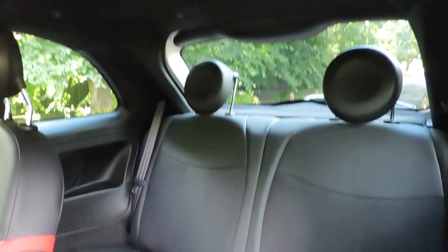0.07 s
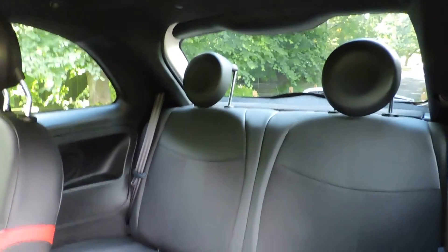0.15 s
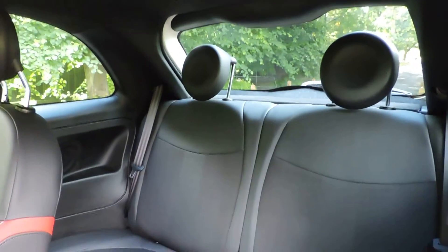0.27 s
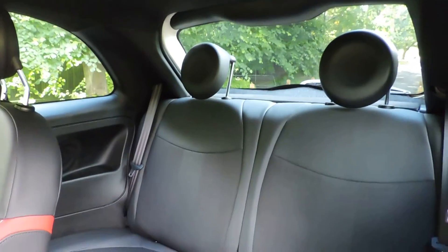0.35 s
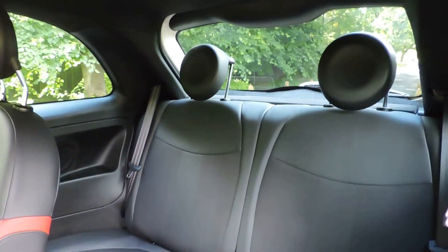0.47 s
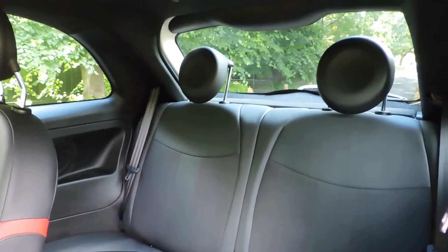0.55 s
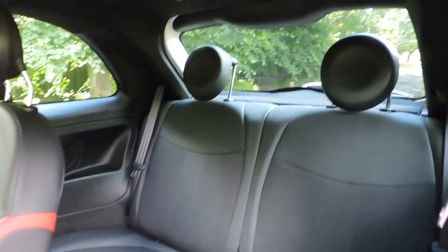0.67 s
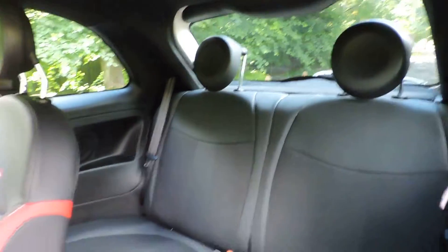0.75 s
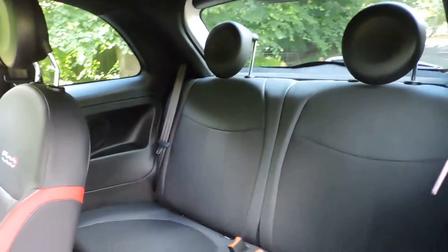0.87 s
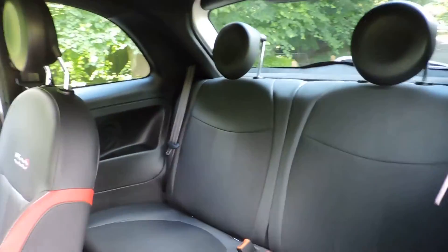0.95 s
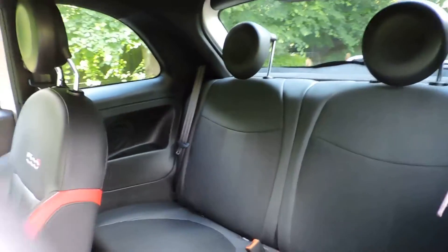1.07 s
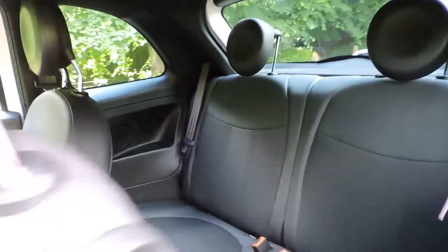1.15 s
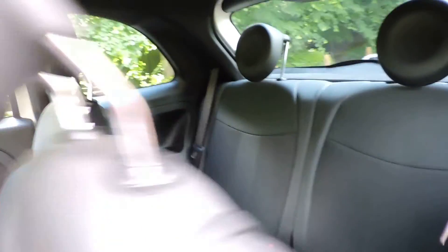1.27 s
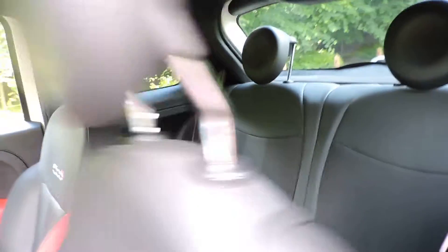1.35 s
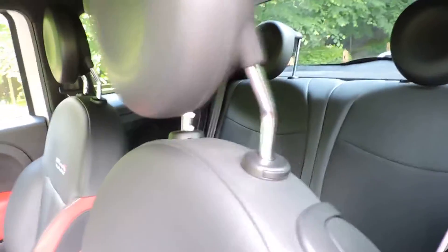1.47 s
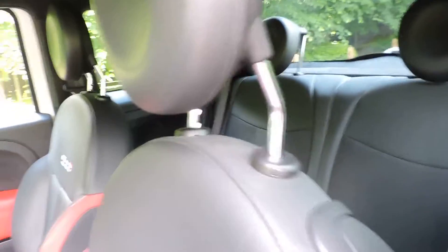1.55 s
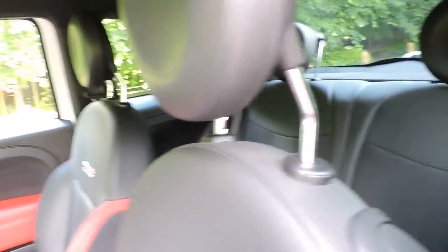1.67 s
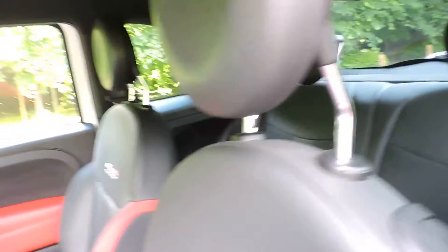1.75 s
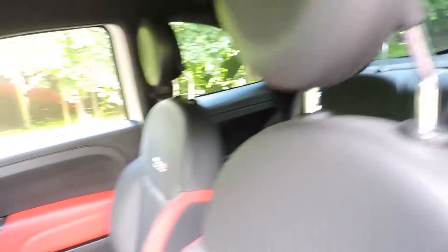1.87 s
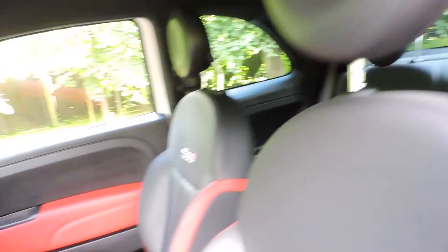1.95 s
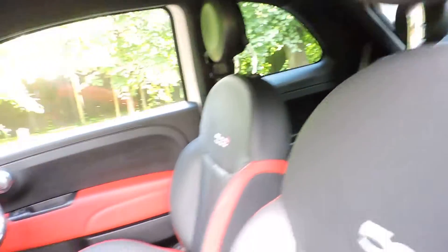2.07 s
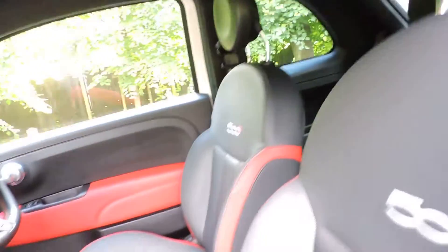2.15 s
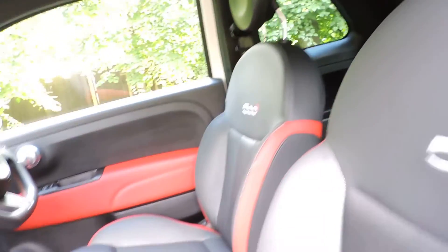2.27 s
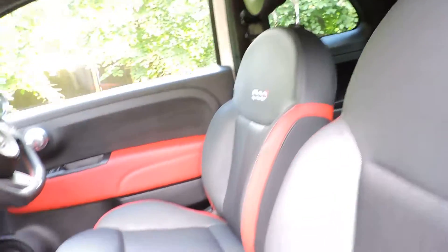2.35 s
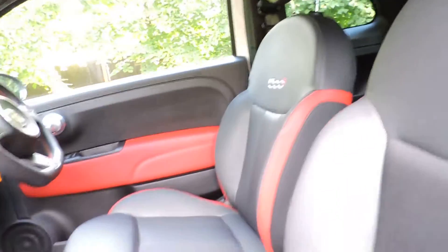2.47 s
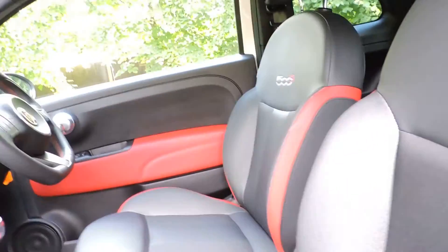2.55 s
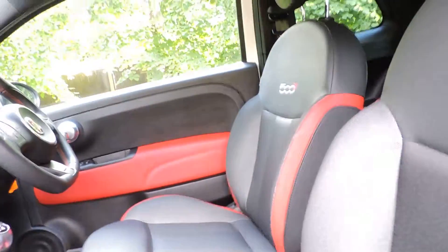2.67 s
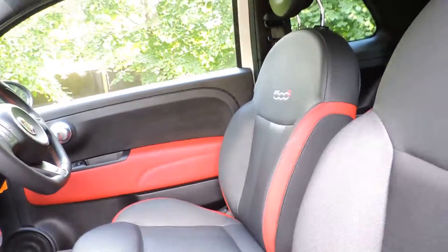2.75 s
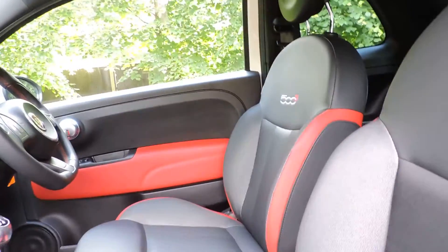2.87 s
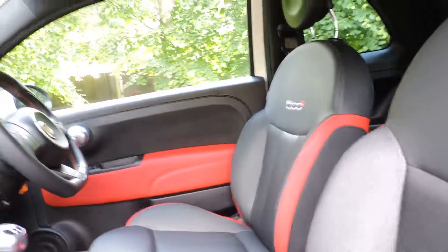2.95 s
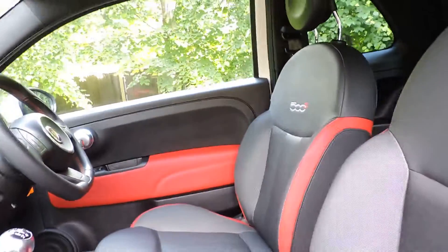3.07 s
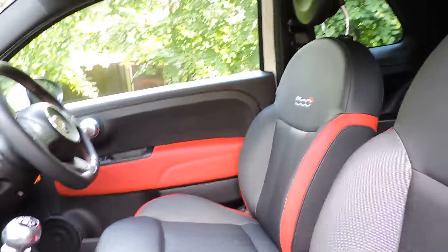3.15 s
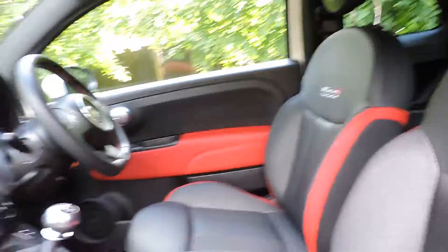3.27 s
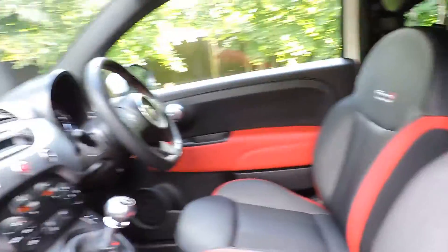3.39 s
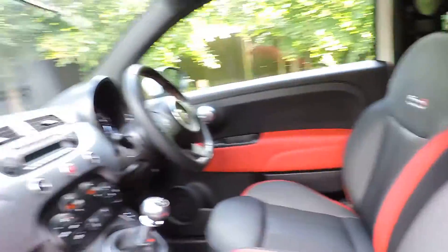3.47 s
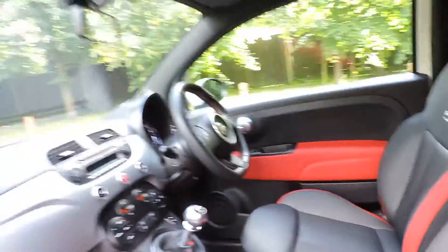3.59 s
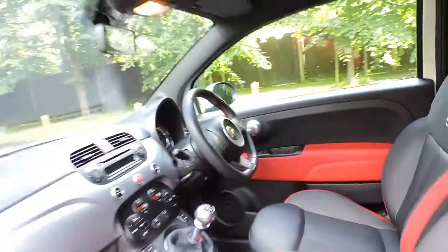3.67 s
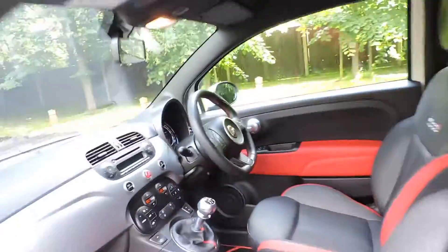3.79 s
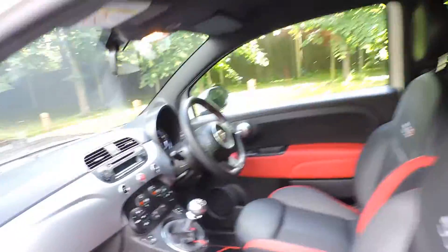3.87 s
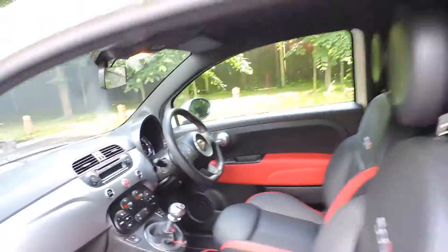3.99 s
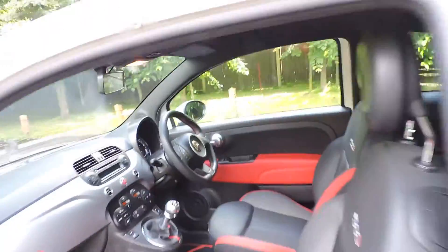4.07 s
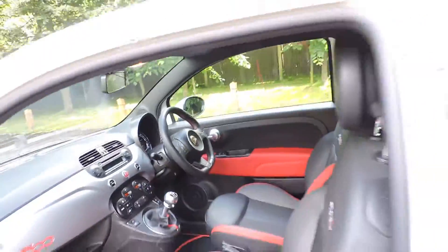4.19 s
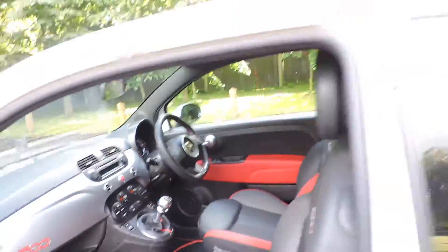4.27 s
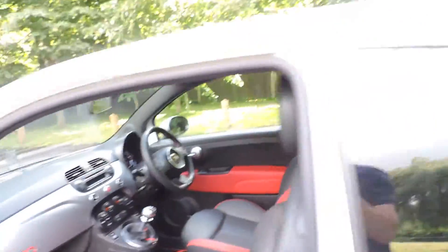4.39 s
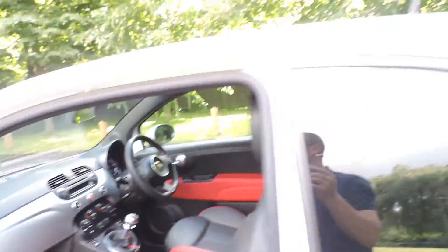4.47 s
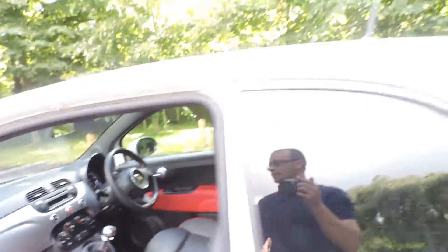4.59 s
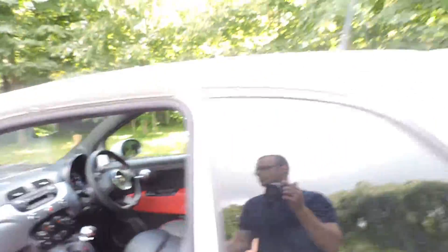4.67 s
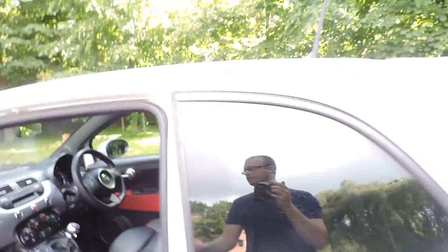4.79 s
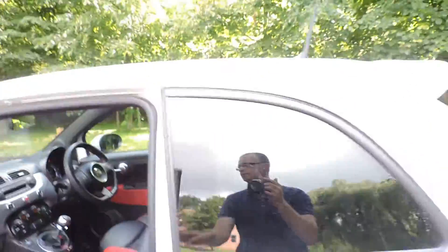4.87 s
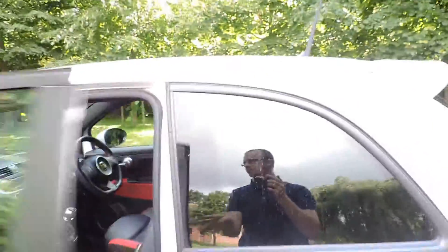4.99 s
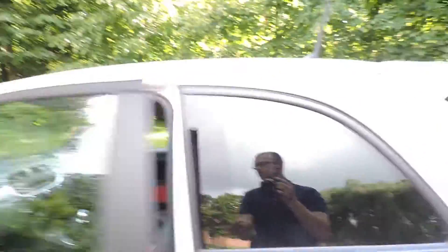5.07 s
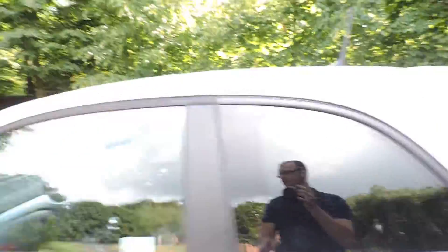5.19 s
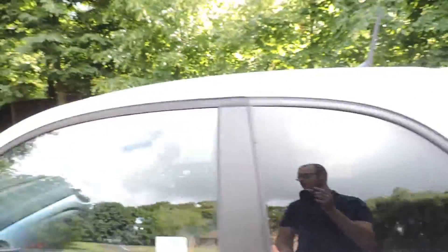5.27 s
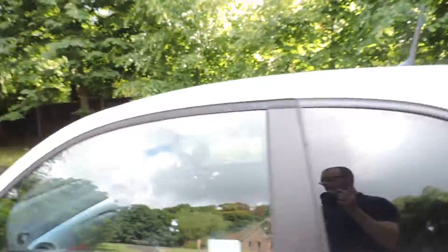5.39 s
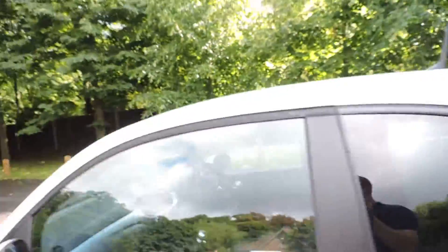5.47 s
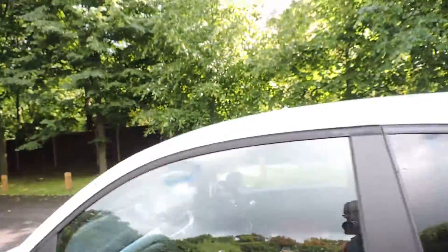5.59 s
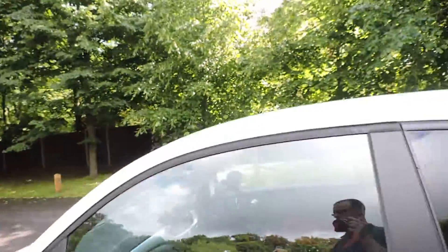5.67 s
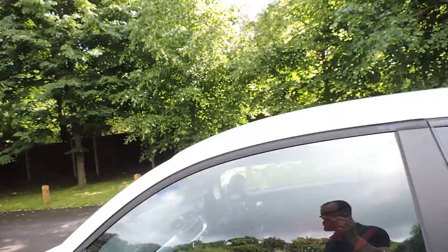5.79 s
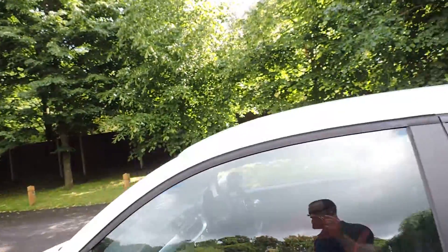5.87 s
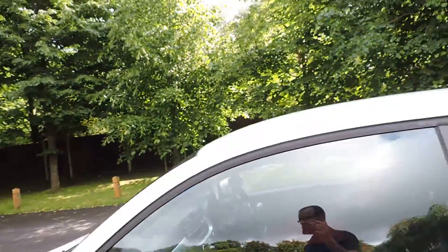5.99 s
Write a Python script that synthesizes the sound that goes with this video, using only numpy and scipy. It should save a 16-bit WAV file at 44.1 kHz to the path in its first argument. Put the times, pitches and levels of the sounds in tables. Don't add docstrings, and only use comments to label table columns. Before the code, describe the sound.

In and beside a small car, light plastic ticks precede a bright steel clack. Upholstery swishes and a padded seat back lands with a dull knock. Feet bump and scrape, a buckle clinks, a strap and sleeves rustle. A quick latch snap merges into a huge, short, distorted door slam, after which the distant traffic dips, then returns with a high bird whistle.

```python
import sys
import numpy as np
from scipy import signal
from scipy.fft import rfft, irfft, next_fast_len
from scipy.io import wavfile
from scipy.ndimage import uniform_filter1d

SR = 44100
rng = np.random.default_rng(int(sys.argv[2]) if len(sys.argv) > 2 else 0)


def digitize_waveform(pressure):
    field = np.atleast_2d(pressure).T
    bounded = np.clip(field, -1, 1)
    quanta = np.round(bounded * 32767).astype(np.int16)
    wavfile.write(sys.argv[1], SR, quanta)


def volts_from_decibels(level):
    exponent = np.asarray(level, float) / 20
    return 10 ** exponent


N = 265923
LONG = next_fast_len(N)
T = np.arange(2 ** 14) / SR


def unit(x):
    return x / np.sqrt(np.mean(x ** 2) + 1e-30)


def band(x, lo_hz, hi_hz):
    return signal.sosfilt(signal.butter(2, [lo_hz, min(hi_hz, 20000)], "bandpass", fs=SR, output="sos"), x)


def on_log(hz, table):
    table_hz, values = np.transpose(table)
    return np.interp(np.log(hz + 1), np.log(table_hz), values)


def fade(t60):
    return np.exp(-np.log(1000) * T / max(t60, .002))


def walk(rate):
    hold = int(SR / rate)
    levels = np.repeat(rng.standard_normal(N // hold + 1), hold)
    return 0.67 * uniform_filter1d(uniform_filter1d(levels, hold), hold)[:N]


def add(out, s, pair):
    i = int(s * SR)
    out[:, i:i + pair.shape[1]] += pair[:, :N - i]


def strokes(table):
    t = np.linspace(0, N / SR, num=N // 20)
    gain = 0
    for s, db, swell_s, fade_s in table:
        away = np.maximum((s - t) / max(swell_s, .002), (t - s) / max(fade_s, .002))
        gain = gain + volts_from_decibels(db - 20 * away ** 1.32)
    return np.interp(np.arange(N) / SR, t, gain)


def pushed(table):
    out = np.zeros((2, N))
    for s, size, hz, push_s, t60 in table:
        swing = (1 - np.exp(-T / push_s)) * fade(t60) * np.sin(2 * np.pi * hz * T)
        add(out, s, size * swing / np.abs(swing).max() * np.ones((2, 1)))
    return out


def ports(near, scattered, pan_db, turn_hz, scatter_db, treble_db=0.):
    hz = np.arange(len(near) // 2 + 1) * SR / len(near)
    lead = np.exp(.5j * np.pi * np.tanh(hz / turn_hz))
    lead = lead * volts_from_decibels(treble_db * np.tanh((hz / 4500) ** 2))
    side = volts_from_decibels(scatter_db) * band(scattered, 1120, 24000)
    left = irfft(rfft(near) * lead, len(near)) + side
    return np.array([left, near - side]) * volts_from_decibels(np.array([[pan_db], [-pan_db]]) / 2)


def blow(modes, dense, peak_db, crack_db, surface, t60, noise):
    rattle = noise * fade(t60) * np.minimum(T / 0.0017, 1)
    lo_hz, hi_hz, dense_db, dense_t60 = dense
    ring = unit(sum(volts_from_decibels(db) * fade(tail) * np.sin(2 * np.pi * hz * T) for hz, db, tail in modes))
    mid_hz = np.sqrt(lo_hz * hi_hz)
    crowd = band(noise[::-1], lo_hz, mid_hz) * fade(dense_t60)
    crowd = crowd + 0.99 * band(noise[::-1], mid_hz, hi_hz) * fade(0.25 * dense_t60)
    ring = ring + volts_from_decibels(dense_db) * unit(crowd)
    first_contact = 3.3 * (T == T[20])
    force = rattle * (1 + 2.7 * fade(0.0019)) + first_contact
    body = band(signal.fftconvolve(force, ring)[:len(T)], 0.63 * lo_hz, 1.85 * hi_hz)
    scrape = rattle + 0.18 * noise * fade(2.6 * t60) * np.minimum(T / 0.01, 1)
    fizz_lo_hz, fizz_hi_hz, fizz_db = surface
    crack = volts_from_decibels(crack_db) * 0.57 * band(scrape, 1600, 5430)
    fizz = volts_from_decibels(crack_db + fizz_db) * 3.3 * band(scrape, fizz_lo_hz, fizz_hi_hz)
    return volts_from_decibels(peak_db) * body / np.abs(body).max() + crack + fizz


def knocks(table, modes, dense, turn_hz, scatter_db, surface, pan_db, treble_db=0.):
    out = np.zeros((2, N))
    for (s, peak_db, scrape_db, t60), noise in zip(table, rng.standard_normal((len(table), 2, len(T)))):
        near, scattered = (blow(modes, dense, peak_db, scrape_db, surface, t60, n) for n in noise)
        add(out, s, ports(near, scattered, pan_db, turn_hz, scatter_db, treble_db))
    return out


def air():
    # [t/s, swell/dB]
    air_swell = [(0, 3), (.34, 1.5), (.81, 0.5), (.99, 2), (1.16, 7.5), (1.28, 6.5), (1.41, 6.5),
                 (1.59, 1.5), (2.18, 0.4), (2.6, 1), (3.02, 1.7), (3.41, 3), (4.05, 5.5), (4.26, 3.5),
                 (4.55, 6.5), (4.94, 4.5), (5.6, -1), (6.03, 6)]
    # [f/Hz, density/dB per Hz]
    air_colour = [(12, -38), (20, -4.5), (75, -7), (117, -3), (156, -0.5), (234, -9.5), (283, -10.5),
                  (311, -12), (351, -10), (514, -22), (828, -23), (1240, -27), (2100, -31), (2600, -35.5),
                  (6000, -58), (7800, -79), (13200, -120)]
    # [f/Hz, density/dB per Hz]
    hiss_colour = [(3000, 0), (4000, -3.5), (5000, -5.5), (6300, -8), (8000, -9.5), (10000, -10),
                   (13000, -10), (15900, -10)]
    # [f/Hz, left-right correlation]
    likeness = [(60, 0.88), (130, 0.95), (290, 0.96), (640, 0.8), (1410, 0.42), (3100, -0.06), (6820, 0),
                (15000, 0)]
    range_edges = [20, 80, 400, 3000, 15900]
    # [resting level/dB, share of the swell (1 = all of it), flicker/dB]
    air_ranges = [
        (-43, 0.83, 10.5),
        (-43.5, 1.09, 5),
        (-51, 0.8, 3.5),
        (-64.5, 0.29, 0),
    ]
    # [t/s, depth/dB, recovery/s]
    ducks = [
        (1.45, -2.5, 0.27),
        (5.25, -3.5, 0.91),
    ]
    hz, t = np.arange(LONG // 2 + 1) * SR / LONG, np.arange(N) / SR
    alike = np.clip(on_log(hz, likeness), -.9, .99)
    mid, side = rfft(rng.standard_normal((2, LONG))) * np.sqrt([1 + alike, 1 - alike])
    pair, out = np.array([mid + side, mid - side]), 0
    swell_s, swell_db = np.transpose(air_swell)
    swell = np.interp(t, swell_s, swell_db, 0, 0)
    for k, (rest_db, share, flicker_db) in enumerate(air_ranges):
        edges = np.geomspace(range_edges[k], range_edges[k + 1], num=4)
        shaped = pair * volts_from_decibels(on_log(hz, hiss_colour if k == 3 else air_colour))
        parts = 0
        for lo, hi in zip(edges, edges[1:]):
            piece = irfft(shaped * (hz >= lo) * (hz < hi), LONG)[:, :N]
            parts = parts + piece * volts_from_decibels(flicker_db * walk(11))
        out = out + unit(parts) * volts_from_decibels(rest_db + share * swell)
    out = out + volts_from_decibels(-50.5) * unit(band(rng.standard_normal(N), 55.8, 61.8))
    duck_db = sum(db * (t > s) * np.exp(-(np.maximum(t - s, 0) / back_s) ** 2) for s, db, back_s in ducks)
    return out * volts_from_decibels(duck_db + np.array([[-.6], [.6]]))


def bird():
    # [t/s, length/s, first f/Hz, last f/Hz, level/dB]
    whistles = [
        (0.348, 0.1, 7500, 6470, -75),
        (3.082, 0.13, 7550, 6260, -71),
        (4.515, 0.17, 8100, 6320, -70.5),
        (4.742, .04, 6450, 6750, -77),
        (4.785, .045, 7000, 6360, -69.5),
        (4.845, 0.054, 6460, 5930, -73),
        (4.997, 0.051, 7240, 6440, -72),
        (5.062, .035, 6280, 5850, -73),
        (5.898, 0.17, 8140, 5980, -65.5),
    ]
    song, t = 0, np.arange(N) / SR
    warble = 1 + .009 * walk(300)
    bend, edge_s, growth_db = 1.1, 0.0072, 4.5
    for s, length, first_hz, last_hz, db in whistles:
        u = np.clip((t - s) / length, 0, 1)
        sag = (1 - np.exp(-bend * u)) / (1 - np.exp(-bend))
        hz = first_hz + (last_hz - first_hz) * sag
        edge = np.clip(np.minimum(t - s, s + length - t) / edge_s, 0, 1)
        song = song + volts_from_decibels(db + growth_db * u) * edge * np.sin(2 * np.pi * np.cumsum(hz * warble) / SR)
    song = np.sqrt(2) * song * volts_from_decibels(3.2 * walk(64))
    leaves = rng.standard_normal((2, len(T))) * fade(.22)
    echo = np.array([signal.fftconvolve(song, k / np.linalg.norm(k))[:N] for k in leaves])
    return song * volts_from_decibels(0) * np.array([[1.0], [1.0]]) * volts_from_decibels(np.array([[1.0], [-1.0]])) + volts_from_decibels(1.5) * echo


def clothing(grain):
    # [t/s of the peak, level/dB, swell/s, fade/s]
    cloth_rubs = [(2.02, -56, 0.16, 0.14), (2.18, -58, 0.13, 0.16), (2.28, -61, 0.091, 0.15),
                  (2.9, -62, 0.0045, 0.11), (3.33, -58, .01, 0.15), (3.48, -63, 0.046, 0.067),
                  (3.62, -56.5, 0.18, 0.17), (3.986, -59, 0.025, 0.031), (4.45, -53, 0.0098, 0.05),
                  (5.364, -71, .015, .012), (5.57, -71, .45, 0.078), (5.688, -67.5, .2, 0.088),
                  (5.85, -70, .09, .3)]
    # [f/Hz, density/dB per Hz]
    cloth_colour = [(6000, -7), (8600, -6.5), (9500, -10), (10500, -4), (11100, -8), (11800, -1.5),
                    (12800, -10), (14600, -15)]
    # [t/s of the peak, level/dB, swell/s, fade/s]
    scuffs = [(2.897, -47, .003, .085), (3.185, -56, .006, .04), (3.307, -48, .003, .02),
              (2.406, -59, .003, .012), (3.38, -64, .01, .015), (.595, -68, .004, .01),
              (.676, -58, .004, .015), (3.852, -50, .004, .03), (3.88, -62, .03, .08),
              (3.93, -62, .035, .05), (4.452, -58, .01, .05), (1.7, -62, .056, .06)]
    # [t/s of the peak, level/dB, swell/s, fade/s]
    strap_pulls = [(.675, -56, .004, .03), (.895, -64, .03, .03), (2.406, -55, .003, .014),
                   (2.896, -50, .002, .014), (3.306, -41, .003, .024), (3.35, -55, .03, .06),
                   (5.275, -41, .003, .007), (3.185, -50, .004, .02), (3.585, -62, .01, .02),
                   (3.935, -60, .03, .03), (3.975, -59, .006, .012)]
    hz = np.arange(LONG // 2 + 1) * SR / LONG
    late = np.exp(-2j * np.pi * hz * np.array([[0], [86e-6]]))
    rub = rfft(grain[1, 0], LONG) * late + 0.54 * rfft(grain[0], LONG)
    cloth = unit(irfft(rub * volts_from_decibels(on_log(hz, cloth_colour)), LONG)[:, :N])
    soles = unit(band(grain[0], 12500, 17000))
    strap = unit(band(grain[1], 3900, 10400))
    return cloth * strokes(cloth_rubs) + soles * strokes(scuffs) + strap * strokes(strap_pulls)


def upholstery(grain):
    # [t/s of the peak, level/dB, swell/s, fade/s]
    swishes = [
        (1.125, -43, 0.047, 0.079),
        (1.435, -42.5, 0.13, 0.019),
        (1.48, -46, 0.011, 0.034),
        (1.645, -57.5, 0.096, 0.072),
        (4.66, -57, 0.56, 0.47),
    ]
    # [f/Hz, width/Hz, level/dB]
    swish_peaks = [(2130, 380, 3), (2640, 200, -8), (3530, 340, -4), (4570, 300, -9), (5300, 300, -11),
                   (6780, 200, -20)]
    # [t/s of the peak, level/dB, swell/s, fade/s]
    shudders = [
        (1.462, -29, .02, .04),
        (1.495, -30, .015, .05),
        (2.91, -33, .015, .04),
        (2.95, -29, .02, .025),
        (2.99, -42, .03, .07),
        (5.275, -19, .03, .03),
        (5.33, -36, .04, .11),
        (1.22, -40, .06, .08),
        (.625, -38, .01, .03),
    ]
    seat = sum(volts_from_decibels(db) * unit(band(grain[0], hz - width / 2, hz + width / 2)) for hz, width, db in swish_peaks)
    seat = unit(seat) + volts_from_decibels(-5.) * unit(band(band(grain[0], 1200, 5500), 500, 6000))
    both = grain[0].sum(axis=0)
    seat = seat + volts_from_decibels(4.0) * unit(band(both, 93, 550))
    padding = unit(band(band(both, 110, 480), 80, 650))
    return seat * strokes(swishes) + padding * strokes(shudders)


def rumble_and_draught(grain):
    # [t/s of the peak, level/dB, swell/s, fade/s]
    rumbles = [
        (1.1, -24.5, 0.056, 0.07),
        (1.5, -31.5, 0.091, 0.094),
        (2.95, -39.5, 0.045, 0.18),
        (3.21, -35, 0.056, 0.11),
        (5.26, -16, 0.08, 0.068),
    ]
    # [t/s of the peak, level/dB, swell/s, fade/s]
    whoosh = [
        (5.218, -33.5, .043, .012),
    ]
    both = grain[1].sum(axis=0)
    shaking, draught = unit(band(both, 94, 290)), unit(band(both, 240, 930))
    return shaking * strokes(rumbles) + draught * strokes(whoosh)


def rubbing():
    grain = rng.standard_normal((2, 2, N)) * volts_from_decibels(2.0 * walk(140))
    return clothing(grain) + upholstery(grain) + rumble_and_draught(grain)


def ticks():
    # [t/s, peak/dB, ring f/Hz, scrape/dB, rattle t60/s]
    small_ticks = [(.124, -40, 1510, -34, 0.02), (0.567, -40, 920, -35, 0.02), (.59, -36.5, 785, -46, 0.031),
                   (0.622, -34, 920, -41, 0.105), (0.653, -39, 690, -52, 0.062), (0.671, -30.5, 1310, -25, 0.033),
                   (0.678, -32, 1230, -33, 0.15), (0.6934, -22.5, 900, -19.5, 0.041), (.884, -39, 720, -47, 0.041),
                   (1.481, -32, 1500, -45, .012), (1.547, -33.5, 1310, -53, 0.011), (1.832, -31, 1400, -31, 0.021),
                   (3.305, -32.5, 670, -32, 0.13), (3.336, -30.5, 870, -37, 0.058), (3.345, -30, 910, -35, 0.15),
                   (3.3707, -26, 920, -50, 0.012), (3.3741, -28, 690, -50, 0.011), (3.381, -25.5, 990, -39, 0.058),
                   (3.407, -24, 1010, -34, 0.0087), (3.413, -32, 960, -44, 0.022),
                   (3.485, -33, 1300, -37, 0.03), (3.581, -38, 740, -42, 0.1), (3.745, -34, 1510, -55, 0.023),
            (3.847, -35, 304, -43, 0.19), (3.93, -38, 770, -39.5, 0.34), (3.975, -29.5, 1710, -29, 0.018),
            (3.985, -29.5, 1480, -24.5, 0.052), (4.448, -36, 1760, -38, 0.081),
            (4.596, -26.5, 1750, -56, 0.0035), (5.046, -34.5, 1620, -45, 0.017),
            (5.119, -41, 1480, -54, 0.032), (5.548, -29, 1650, -61, 0.0076), (5.558, -37, 1500, -68, 0.024),
            (5.569, -37.5, 1740, -61, 0.01), (5.585, -41, 1610, -59, .008), (2.94, -29, 1750, -54, 0.075),
            (0.941, -36, 1300, -58, 0.017), (1.245, -37, 900, -50, 0.018)]
    out, table = np.zeros((2, N)), small_ticks
    fizz = (5200, 15500, -27)
    for (s, peak_db, hz, scrape_db, t60), noise in zip(table, rng.standard_normal((len(table), 2, len(T)))):
        dense = (.6 * hz, 1.22 * hz, -2, .014)
        near, scattered = (blow([(hz, 0, .0045)], dense, peak_db, scrape_db, fizz, t60, n) for n in noise)
        add(out, s, ports(near, scattered, -1.22, 2800, -10.0))
    return out


def cabin_air():
    # [t/s, signed peak 0-1, f/Hz, push/s, t60/s]
    seat_booms = [(.745, -.035, 36, .01, .29), (1.005, .03, 40, .006, .3), (1.129, -.1, 36, .06, .3),
                  (1.47, .27, 31.5, .02, .33), (1.452, .12, 78, .004, .09), (1.486, -.07, 68, .01, .22),
                  (1.607, .04, 31, .01, .3), (2.9, .03, 62.6, .015, .71), (2.894, .03, 118, .006, .14),
                  (1.083, .028, 204, .012, .13), (3.846, .05, 258, .0027, .06)]
    # [t/s, signed peak (1 = full scale), f/Hz, push/s, t60/s]
    door_booms = [
        (5.221, .45, 48, .003, .06),
        (5.2305, -1.5, 35, .005, .14),
        (5.262, -.1, 36, .006, .3),
        (5.2455, .5, 98, .008, .13),
    ]
    return pushed(seat_booms + door_booms)


def panels():
    # [t/s, signed peak 0-1, f/Hz, push/s, t60/s]
    panel_rings = [(.7203, .5, 1555, .0008, .028), (.7275, .22, 1560, .001, .04),
                   (.7222, .24, 555, .001, .022), (.7345, .24, 900, .0008, .02),
                   (.736, .03, 120, .008, .08), (1.442, -.12, 200, .004, .08),
                   (1.4445, .12, 600, .001, .03), (1.4455, -.15, 910, .001, .035),
                   (1.457, .12, 350, .002, .06), (2.8963, .17, 143, .004, .09),
                   (2.966, -.05, 150, .006, .16), (2.9045, .07, 760, .002, .04),
                   (2.951, -.13, 340, .003, .035), (3.3752, .11, 880, .0012, .018),
                   (5.2305, .35, 770, .002, .035), (1.489, -.08, 175, .004, .2),
                   (1.515, -.06, 133, .006, .25), (5.2195, -.4, 755, .004, .085),
                   (5.221, .17, 1125, .002, .05), (5.236, .45, 203, .004, .13),
                   (5.2547, -1., 332, .001, .065), (5.2725, .25, 62, .003, .1),
                   (5.277, .25, 268, .003, .12), (5.322, -.09, 75, .008, .1)]
    return pushed(panel_rings)


def shifting():
    # [t/s, body peak/dB, scrape/dB, rattle t60/s]
    shoe_knocks = [(1.013, -26.5, -62, 0.075), (1.075, -35, -62, 0.15), (1.094, -29, -64, 0.072),
                   (1.124, -31, -55.5, 0.1), (1.238, -29.5, -49, 0.03), (2.404, -26, -31.5, 0.087),
                   (2.894, -13.5, -28.5, 0.13), (2.908, -18, -43, 0.16), (2.924, -19, -30, 0.053),
                   (2.936, -18.5, -33, 0.092), (2.953, -23.5, -36.5, 0.018), (3.033, -29.5, -60, 0.014)]
    # [f/Hz, level/dB, t60/s]
    sill_modes = [(96, -8, 0.039), (144.7, 14, 0.11), (207.7, 6, 0.144), (343, 7, 0.09), (456, -21, 0.041),
                  (585, 1, 0.076), (1010, 4, 0.028), (1500, 3, 0.024), (2300, -17, .025)]
    # [t/s, body peak/dB, scrape/dB, rattle t60/s]
    buckle_knocks = [
        (3.18, -22, -30.5, 0.11),
        (3.195, -32, -45, 0.14),
        (3.219, -54, -54, 0.031),
    ]
    # [f/Hz, level/dB, t60/s]
    buckle_modes = [(210, -9, .06), (450, 3, .35), (610, -2, .05), (900, -3, .035), (1300, -4, .03),
                    (1650, -7, .03), (2200, -7, .03)]
    shoes = knocks(shoe_knocks, sill_modes, (78, 654, 3.4, 0.088), 1250, -22.0, (7900, 8300, -24.5), -1.4)
    buckle = knocks(buckle_knocks, buckle_modes, (420, 2000, 0.88, 0.12), 1500, -2.5, (5500, 16000, -24), -.4)
    return shoes + buckle


def seat():
    # [t/s, body peak/dB, scrape/dB, rattle t60/s]
    catch_blows = [
        (.708, -21, -34, 0.036),
        (.7125, -8.5, -21, 0.031),
        (.7165, -15.5, -31, 0.017),
        (.7205, -2.5, -16, 0.012),
        (.7235, -11, -20, 0.02),
        (.727, -10.5, -27, 0.03),
        (.7305, -9, -31, 0.022),
        (.734, -15, -24, 0.023),
        (.744, -21.5, -45, 0.052),
    ]
    # [f/Hz, level/dB, t60/s]
    catch_modes = [(340, -4, .04), (550, -1.5, .03), (856, -3, .025), (1177, -4, .025), (1550, 4.5, .024),
                   (2470, -8, .018), (2900, -11, .018), (3330, -9, .02)]
    # [t/s, body peak/dB, scrape/dB, rattle t60/s]
    backrest_blows = [
        (1.44, -17, -40, 0.088),
        (1.445, -7, -9, 0.036),
        (1.459, -13, -44, 0.017),
        (1.478, -23, -51, 0.16),
        (1.657, -29, -44, 0.013),
    ]
    # [f/Hz, level/dB, t60/s]
    backrest_modes = [(106.5, -3, 0.15), (172, 9, 0.09), (220.4, 11.5, 0.018), (365, 6, 0.098),
                      (467, -7, 0.032), (555, 15.5, 0.033), (740, 11, 0.032), (846, 15, 0.037),
                      (1350, 11, 0.035), (2136, 6, 0.048)]
    catch = knocks(catch_blows, catch_modes, (420, 3400, 1.5, .04), 1700, 1, (5600, 11500, -7), -1.3, treble_db=7.0)
    backrest = knocks(backrest_blows, backrest_modes, (92, 1398, -3, 0.03), 2300, -16.0,
                      (4500, 11000, -29.5), -1.5)
    return catch + backrest


def door():
    # [t/s, body peak/dB, scrape/dB, rattle t60/s]
    latch_blows = [
        (5.212, -35, -44, 0.066),
        (5.2185, -7.5, -24, 0.019),
        (5.225, -8.5, -14, 0.022),
    ]
    # [f/Hz, level/dB, t60/s]
    latch_modes = [(770, 26, 0.02), (918, -23, 0.023), (1230, -27, 0.011)]
    # [t/s, body peak/dB, scrape/dB, rattle t60/s]
    slam_blows = [
        (5.231, 5.5, -12, .032),
        (5.242, -7, -46, .012),
        (5.255, -3, -17.5, .029),
        (5.265, -17.5, -34, .023),
        (5.281, -23, -26, .016),
    ]
    # [f/Hz, level/dB, t60/s]
    door_modes = [(98, -14, 0.077), (162, -9, 0.13), (225, -4, 0.083), (266, -25, 0.072), (336, 6, 0.16),
                  (439.6, -1, 0.15), (598, -42, 0.11), (770, 1, 0.031), (1150, -41, 0.079),
                  (1480, -44, 0.017)]
    latch = knocks(latch_blows, latch_modes, (401, 1997, -17, -1), 4300, -21, (4500, 9000, -26), .1)
    slam = knocks(slam_blows, door_modes, (168, 1150, 0.75, 0.095), 3400, -14.0,
                  (6000, 15800, -23), -2.6, treble_db=7.0)
    return latch + volts_from_decibels(1.5) * slam


def scene():
    background = air() + bird()
    return background + rubbing() + ticks() + cabin_air() + panels() + shifting() + seat() + door()


def low_pass(x):
    return signal.sosfilt(signal.butter(12, 15660, fs=SR, output="sos"), x)


def record(dry):
    corners_hz = [5., 19.]
    heard = np.array([signal.lfilter(*signal.butter(1, hz, "highpass", fs=SR), v) for hz, v in zip(corners_hz, dry)])
    flat = 0.96 * np.tanh(np.abs(heard / 0.93) ** 2.834) ** (1 / 2.773) * np.sign(heard)
    flat = signal.sosfilt(signal.ellip(10, .2, 70, 15700, fs=SR, output="sos"), flat)
    return low_pass(flat)


dry = scene()
out = record(dry)
digitize_waveform(out)
```